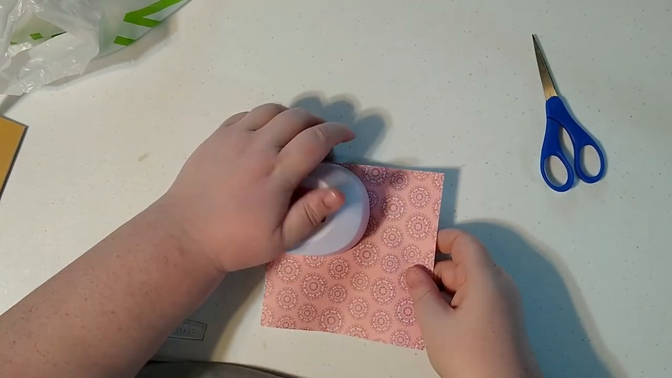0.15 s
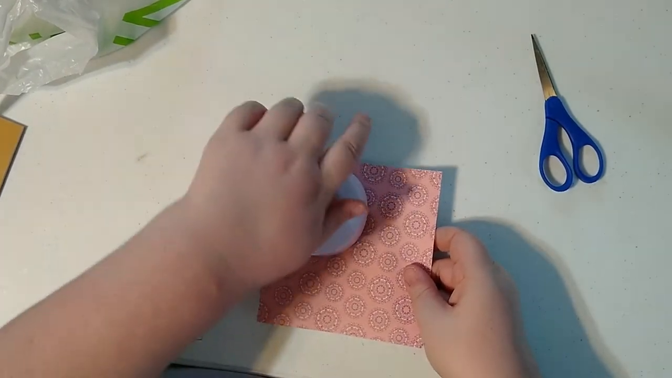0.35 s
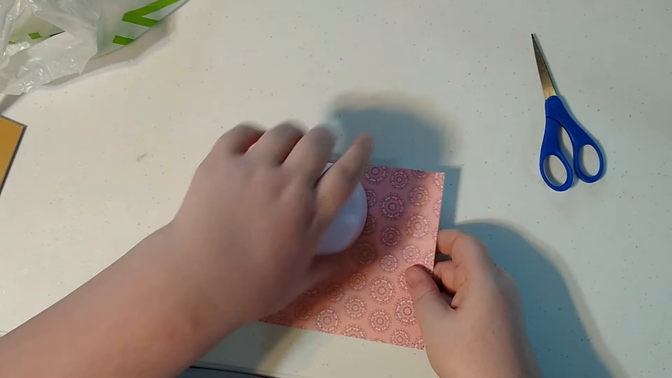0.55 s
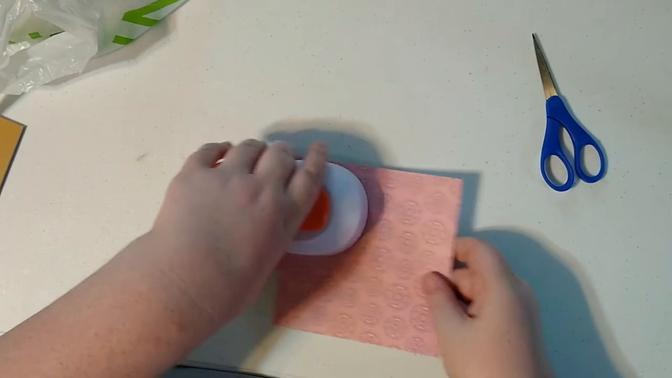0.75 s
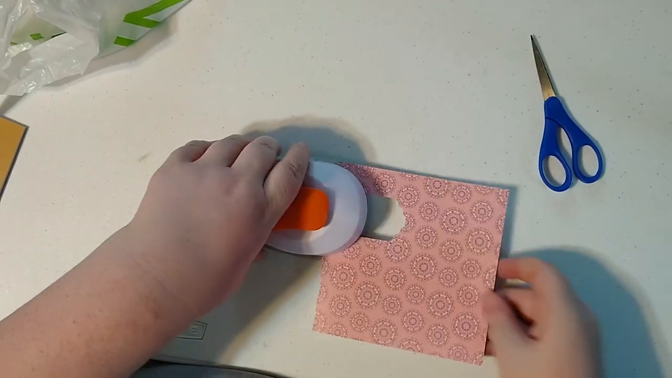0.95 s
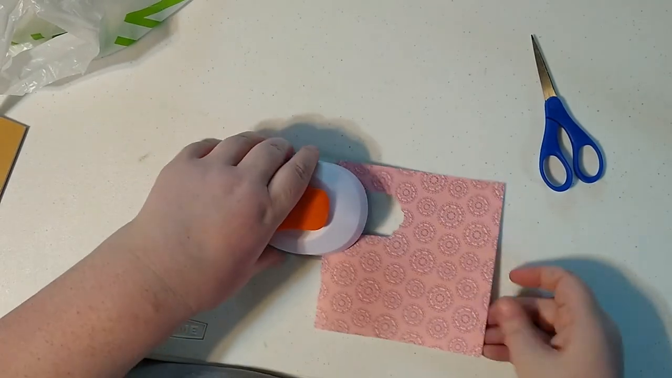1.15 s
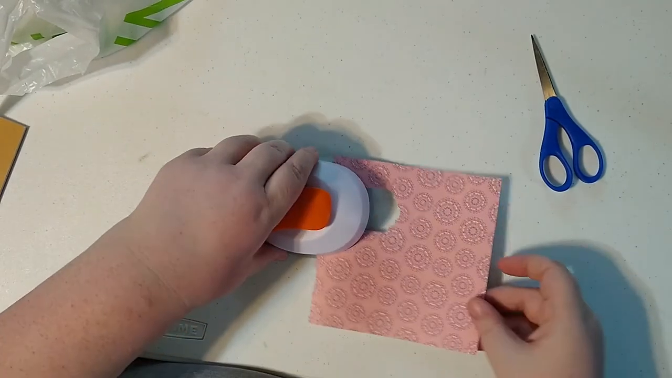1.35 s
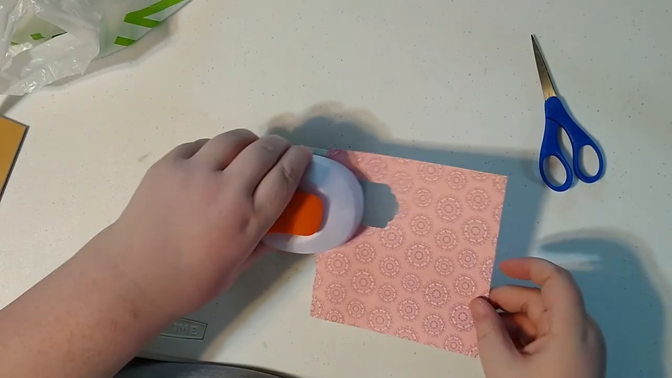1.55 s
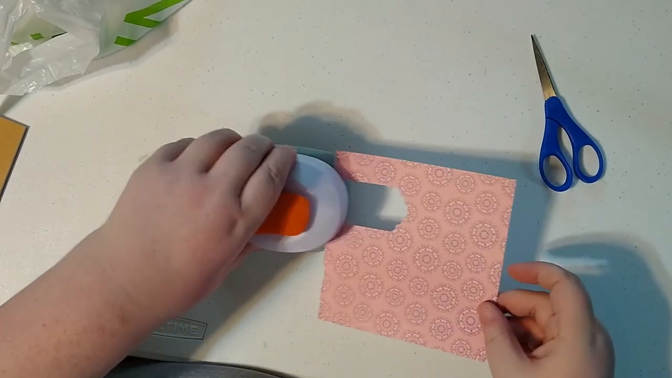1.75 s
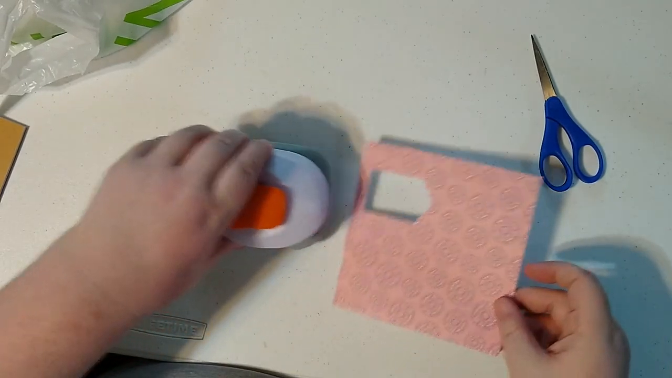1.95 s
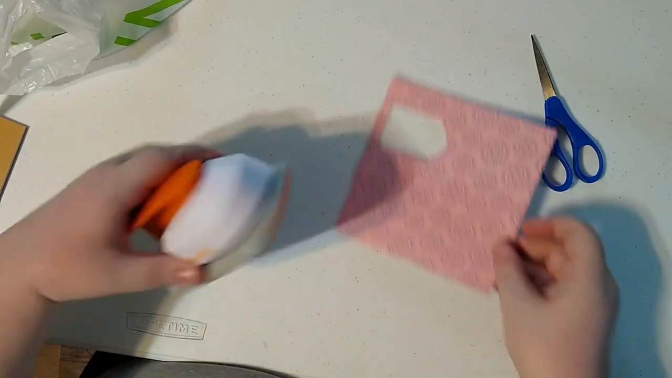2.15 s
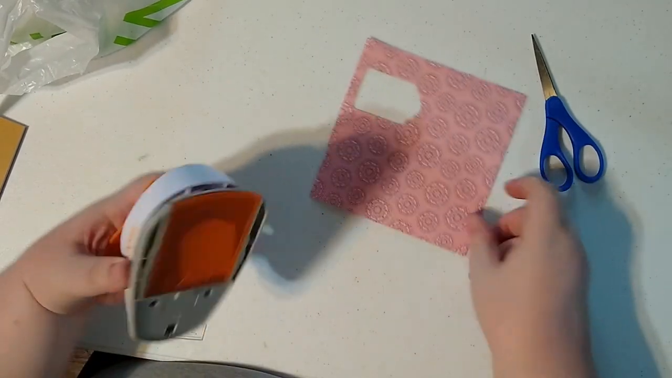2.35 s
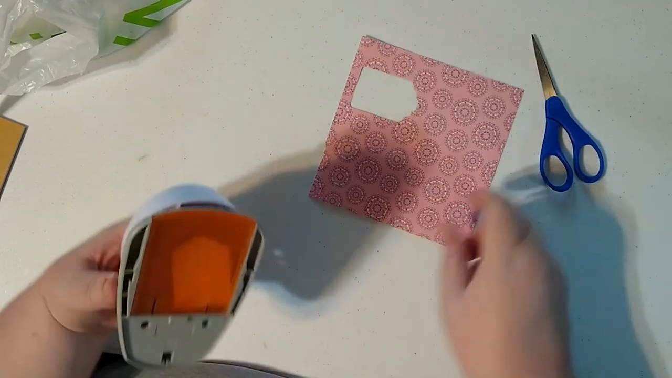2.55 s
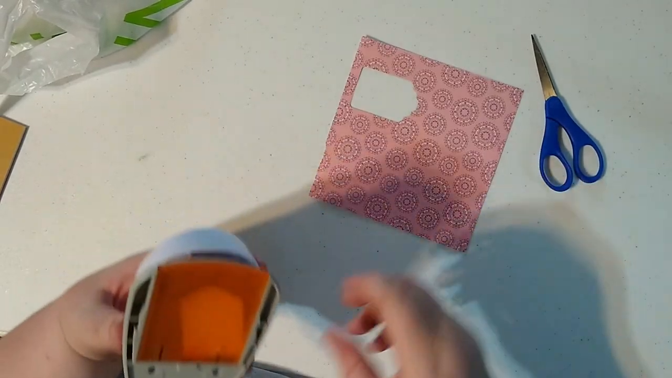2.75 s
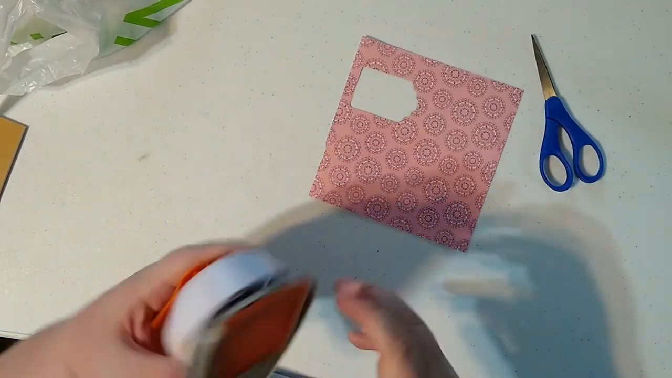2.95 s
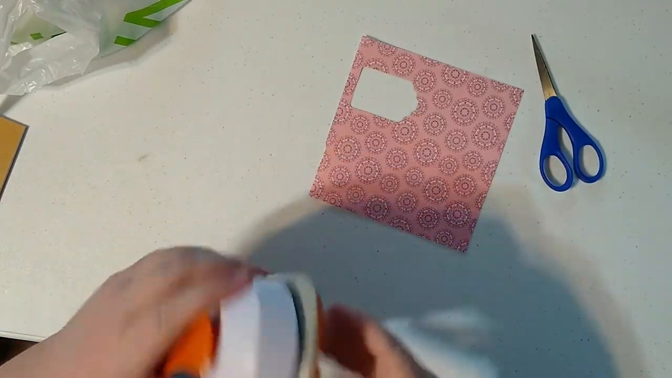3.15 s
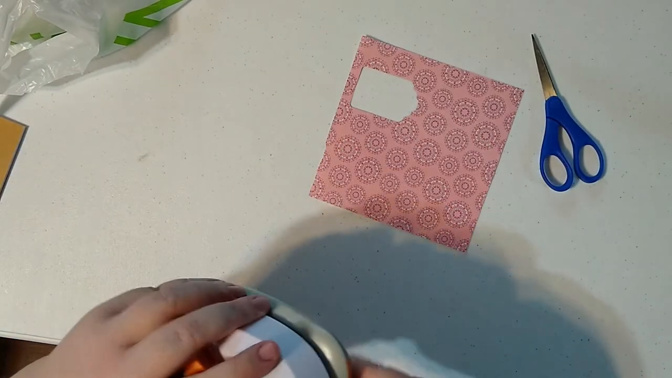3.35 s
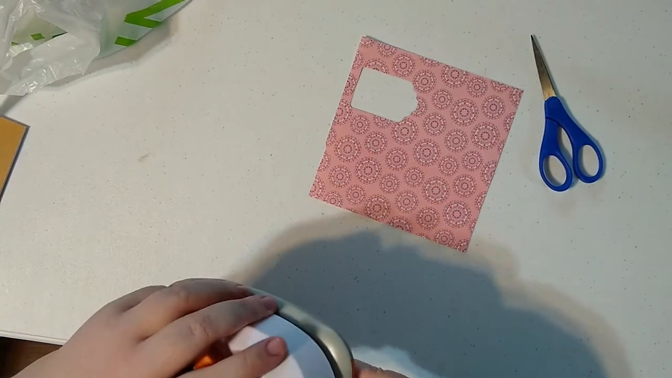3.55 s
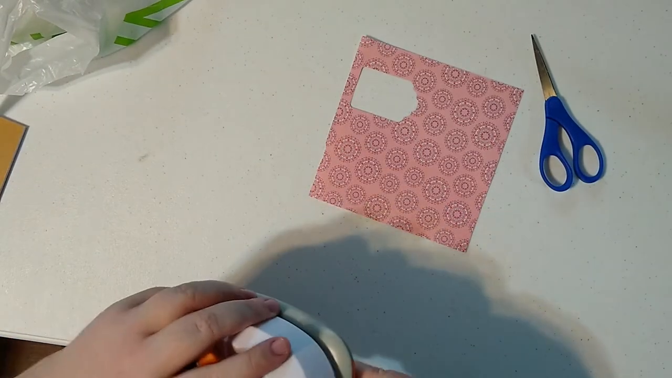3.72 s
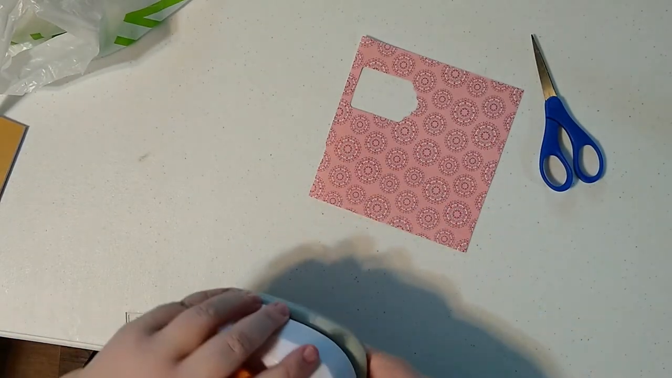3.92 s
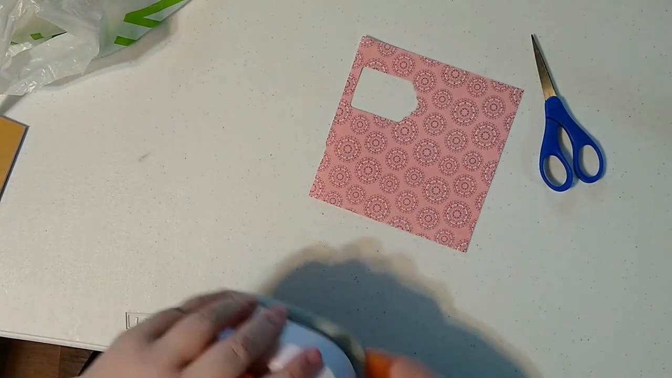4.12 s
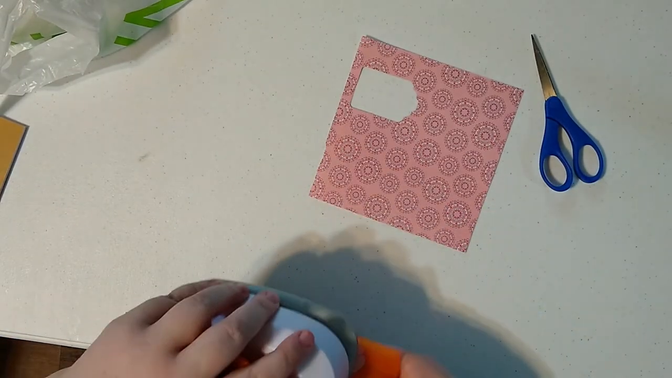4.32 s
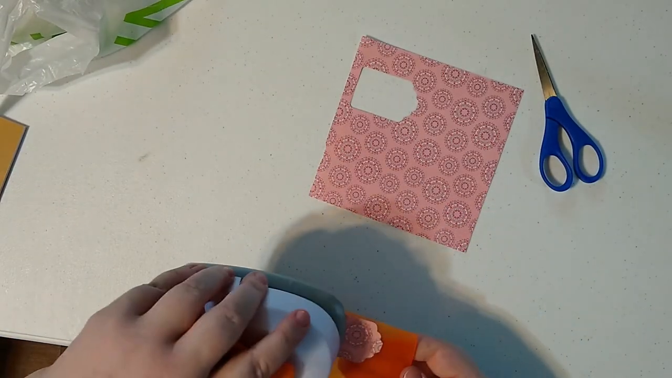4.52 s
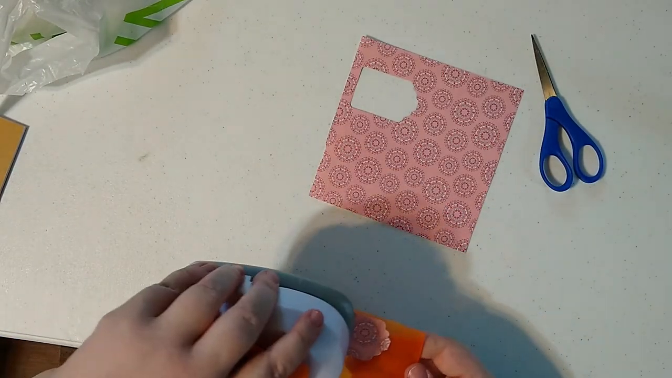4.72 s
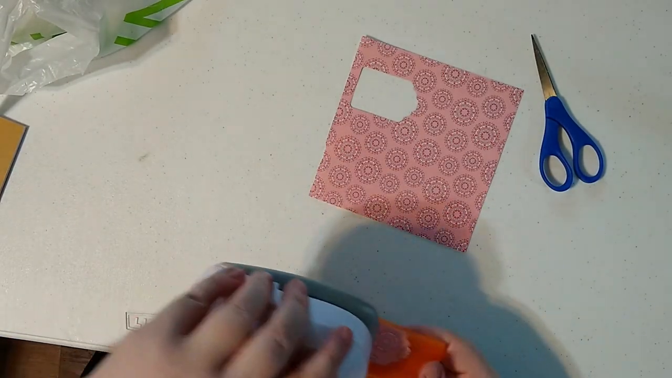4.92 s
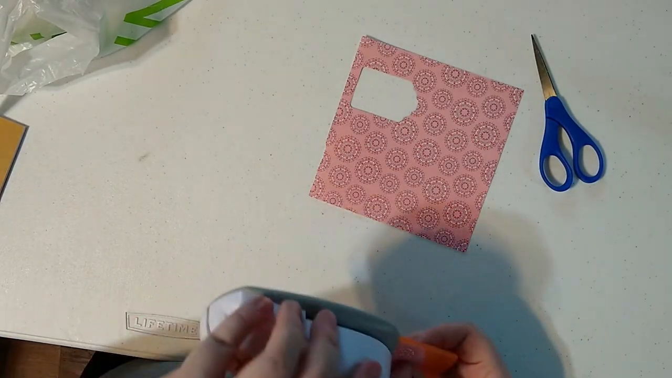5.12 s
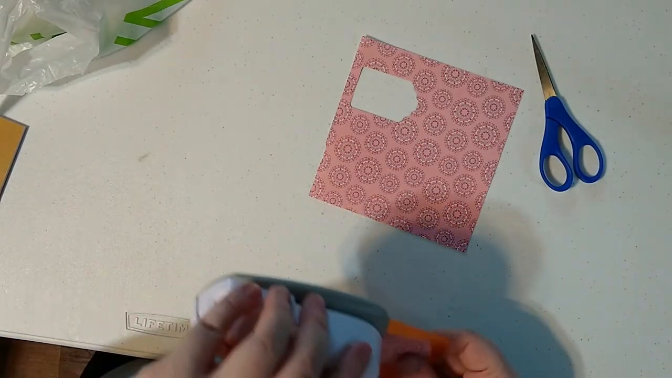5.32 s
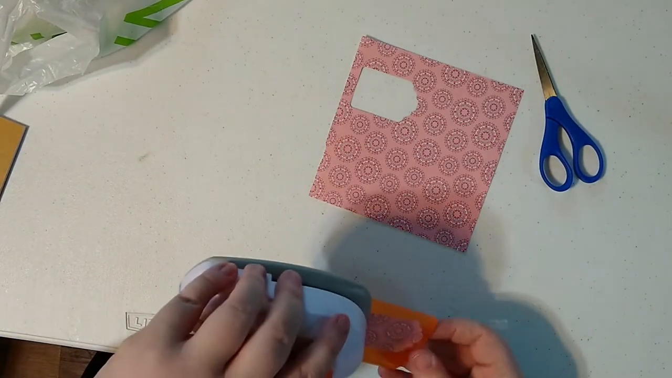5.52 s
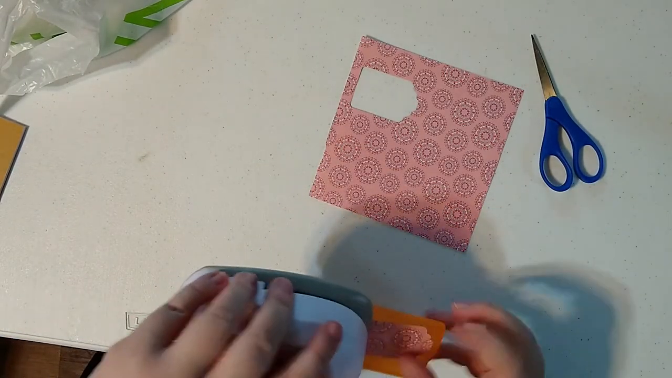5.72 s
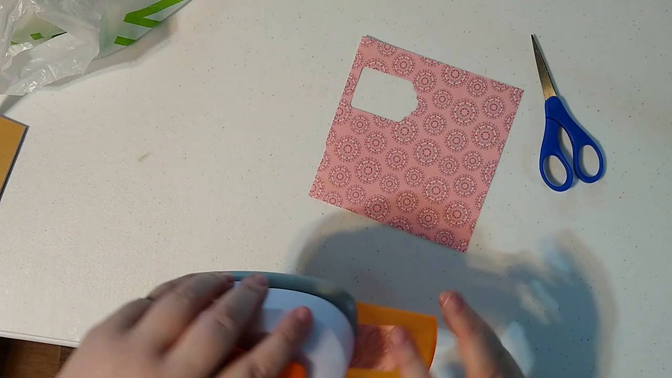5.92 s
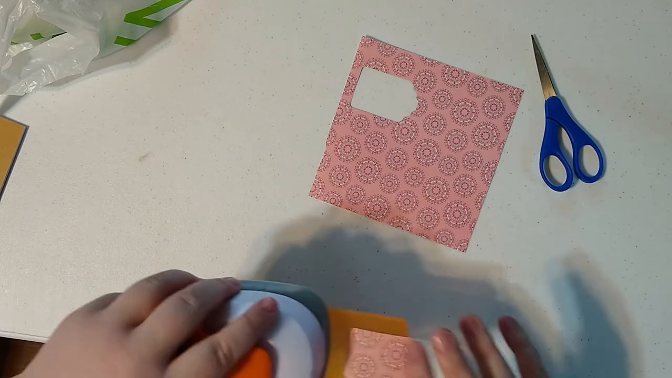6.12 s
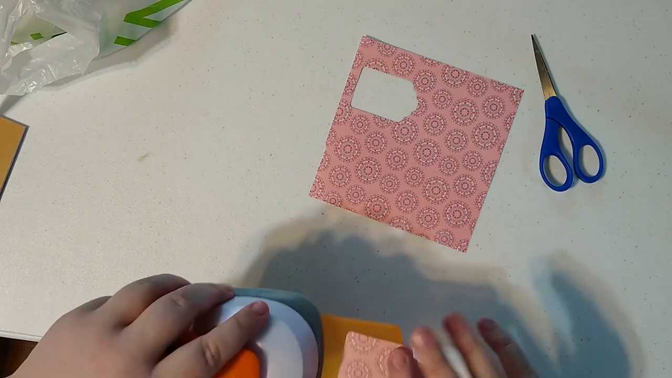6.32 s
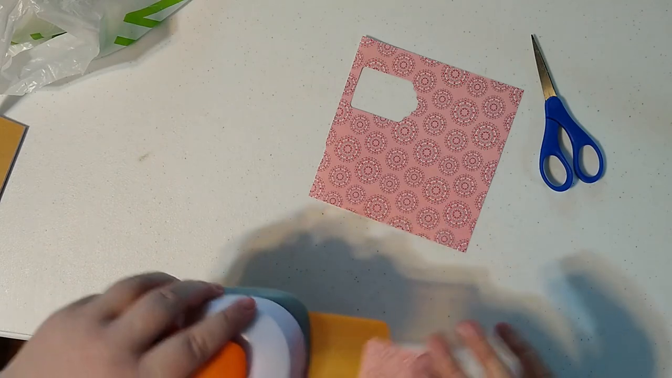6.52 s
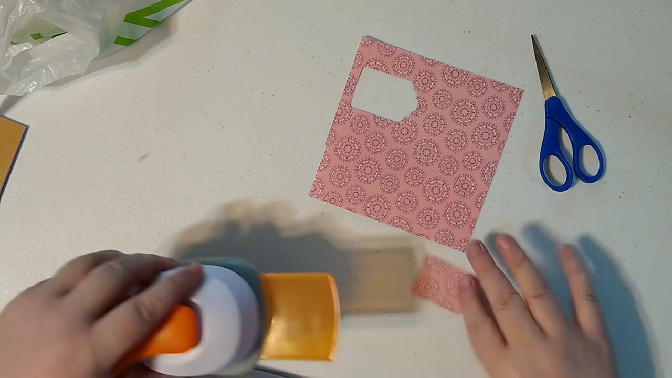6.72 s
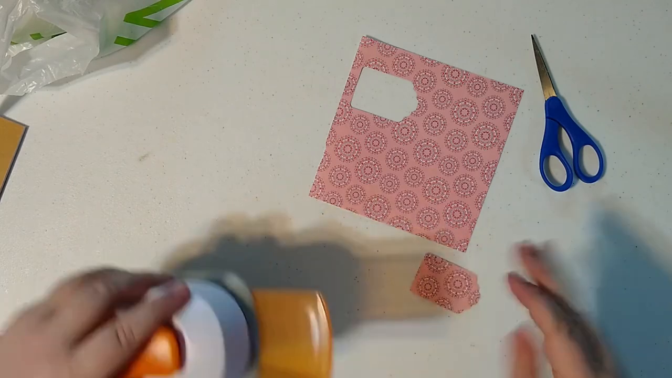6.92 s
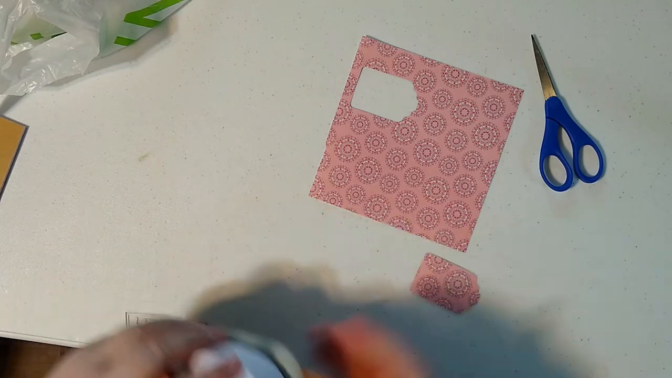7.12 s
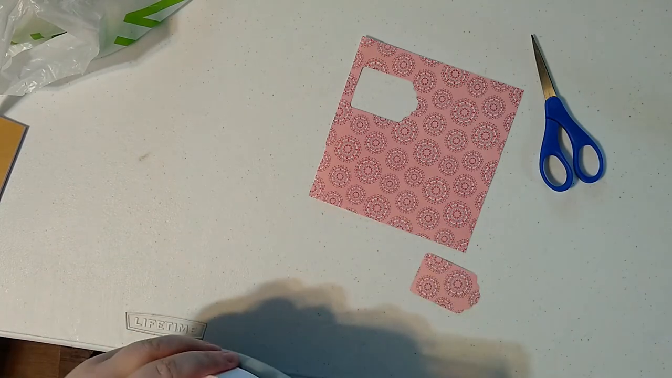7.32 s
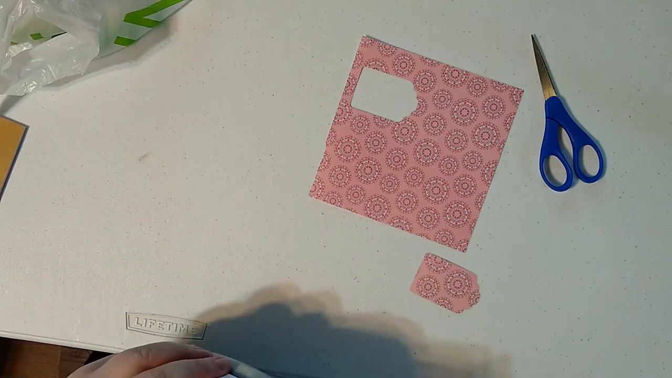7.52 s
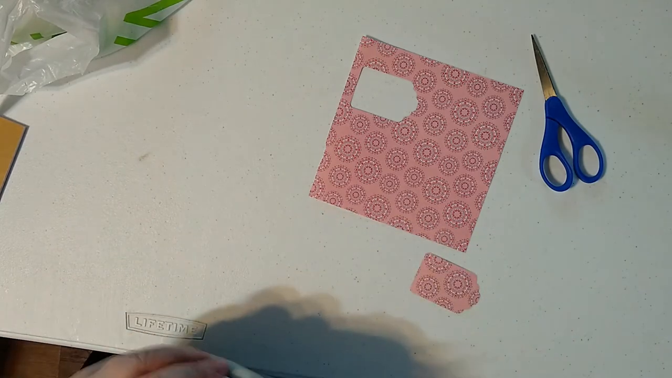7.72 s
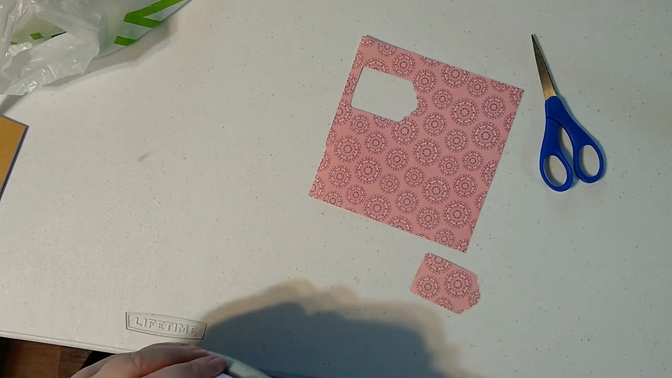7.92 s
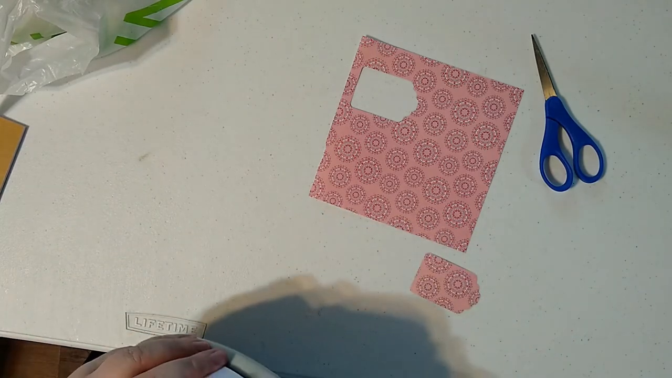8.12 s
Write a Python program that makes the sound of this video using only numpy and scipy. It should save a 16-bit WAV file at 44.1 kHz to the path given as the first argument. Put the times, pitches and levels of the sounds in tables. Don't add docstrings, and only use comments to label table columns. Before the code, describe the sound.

Quiet, small-room air with faint mains hum and light hiss, heard close in stereo. At 0.25 s a soft slack movement leads into a quick plastic creak with crackling paper fibres; around 0.39 s the sheet tears through with a sharp crunch, and at 0.44 s the punch slams home, by far the loudest sound, a hard thud with a bright crack and a table shudder dying within about 0.2 s. At 1.04 s the lever springs back in a light rattle. Thin paper rustles and faint knocks continue to 3.5 s as the punch is turned over. From 3.7 to 4.6 s the tray clicks, catches and scrapes outward. Very faint ticks and fine rubbing follow until 6.9 s, where there is a soft bump. From 7.3 s the tray knocks and scrapes inward, then snaps shut at 7.86-7.9 s in a loud, bright plastic clatter that quickly settles.

```python
import sys
import numpy as np
from scipy import signal
from scipy.fft import rfft, irfft, next_fast_len
from scipy.io import wavfile

SR = 44100
rng = np.random.default_rng(int(sys.argv[2]) if len(sys.argv) > 2 else 0)


def output_pcm(signal):
    pcm = np.clip(np.atleast_2d(signal).T, -1, 1) * 32767
    wavfile.write(sys.argv[1], SR, np.round(pcm).astype(np.int16))


def volts(x):
    e = np.asarray(x, float) / 20
    return 10 ** e


N = 359856

# pitch in Hz, width in Hz, level in dB.
TRAY_WALLS = [(2970, 920, 4.5), (3840, 650, -0.5), (5100, 2700, -10.5), (7800, 2200, -18.5)]


def slam():
    # start in seconds, peak in dB, pitch of the push in Hz.
    blow = (.4408, -0.65, 520)
    # pitch in Hz, level in dB, time to fade by 60 dB in seconds.
    table_notes = [(135.1, -7.5, 0.21), (187, -12, 0.2), (227.4, -3, 0.17), (272, -8, 0.25), (324, 2, 0.16),
                   (397.6, 2, 0.094), (455, -3, 0.13), (514, 1, 0.12), (537.4, -8, 0.17), (580, -4, 0.11),
                   (760.5, -6, .12), (820, -2.5, 0.11), (899, -10.5, 0.095), (990, -16.5, 0.14)]
    # pitch in Hz, level in dB per Hz.
    shudder_colour = [(24, -68), (50, -36), (90, -26), (134, -5), (230, -9.5), (298, -13.5), (333, -2.5),
                      (571, -18), (789, -19.5), (1680, -34.5), (2230, -45), (3220, -42), (7000, -59.5),
                      (9100, -93), (15400, -120)]
    start, db, push_hz = blow
    out, t = np.zeros((2, N)), np.arange(SR // 3) / SR
    lead_in = .002
    late = np.maximum(t - lead_in, 0)

    u = np.pi * push_hz * (t - lead_in)
    push = (1 - 2 * u ** 2 - 0.029 * u ** 3) * np.exp(-u ** 2)

    crack_modes = modes([(1550, 500, 3), (3200, 1400, 0), (5600, 2500, -12), (11000, 7000, -19)])
    crack = volts(-6.5 - 60 * late / 0.0049) * (late > 0) * rng.standard_normal(len(t))
    crack = filtered(crack, lambda f: crack_modes(f) * resonance(f, 2300, 6000))

    ring = np.zeros(len(t))
    for hz, note_db, t60 in table_notes:
        fade = volts(note_db - 60 * late / min(t60, .17))
        ring += fade * np.sin(2 * np.pi * hz * late + rng.uniform(0, 2 * np.pi))
    shudder = unit(filtered(rng.standard_normal((2, len(t))), lambda f: volts(along(shudder_colour, f))))
    shudder = shudder * volts(-60 * late / 0.18)
    rise = 1 - np.exp(-late / 0.0026)

    def land_twice(x):
        second = np.pad(x, ((0, 0), (round(.022 * SR), 0)))[:, :len(t)]
        return x + volts(-3) * second

    thump = push + crack + land_twice(volts(-15) * shudder * rise)
    add(out, volts(db) * room(thump, wet_db=-8.5, life=0.76), start - lead_in)
    add(out, volts(db - 12.5) * land_twice(peak_one(ring) * rise * [[1], [1]]), start - lead_in)
    return out


def press():
    # time in seconds, creak in dB.
    force = [
        (.3, -69.5),
        (.324, -49),
        (.342, -32),
        (.378, -34.5),
        (.388, -28),
        (.397, -19.5),
        (.41, -30.5),
        (.428, -38.5),
        (.439, -36),
    ]
    # pitch in Hz, level in dB per Hz.
    creak_colour = [(35, -48.5), (60, -22.5), (139, 4), (415, -2), (517, 3.5), (674, -3.5), (1300, -15.5),
                    (1570, -11.5), (2500, -31), (3250, -55.5), (5500, -120)]
    # pitch in Hz, level in dB per Hz.
    tear_colour = [(710, -45), (1200, -16), (1570, -8), (2100, -14.5), (3440, -16), (7970, -36),
                   (8880, -57), (9990, -32.5), (15700, -41)]
    # start in seconds, length in seconds, level in dB.
    slack_move = (.254, .068, -53.5)
    t = np.arange(N) / SR
    seconds, force_db = np.transpose(force)
    creak = volts(np.interp(t, seconds, force_db, -140, -140))
    tear = volts(-37.5) * (creak / volts(-28.5)) ** 1.05

    start, length, db = slack_move
    late = np.clip(t - start, 0, length)
    slack = volts(db - 127 * late)
    slack = slack * np.minimum(late / 0.002, 1) * (late < length)
    slack_colour = [(250, -19.5), (400, -3), (680, -1.5), (950, -13), (1500, -20.5), (2500, -71.5)]
    out = slack * grainy(slack_colour, rough_db=1.0, rate=130)
    out = out + creak * grainy(creak_colour, rough_db=-0.5, rate=120)
    return out + tear * grainy(tear_colour, rough_db=3.5, rate=420)


def die_breaks_through():
    # start in seconds, peak in dB, pitch in Hz, click of the walls in dB.
    jolts = [
        (0.382, -25.5, 1298, -14),
        (0.3928, -11, 1589, -16),
        (0.396, -17, 581, -17.5),
        (0.4, -19, 880, -14),
    ]
    return taps(jolts, own_db=2.5, wet_db=-8, life=0.99, edge_db=-30.5, t60=0.0071, thin_hz=420,
                attack=.0004, ring_db=-5, ring_cycles=22)


def fibres_crackle():
    # start in seconds, peak in dB, pitch in Hz, click of the walls in dB.
    snaps = [(.305, -62, 650, 0), (.309, -60, 630, -1), (.328, -38, 520, -14), (.3333, -42, 668, -3),
             (.3417, -36, 510, -4.5), (.352, -36, 600, -3), (.3602, -36, 641, -4.5), (.366, -37.5, 560, -6),
             (.377, -34.5, 1250, -4)]
    return taps(snaps, own_db=1.5, wet_db=-9.5, life=0.8, edge_db=-22, t60=.007, thin_hz=350, attack=.0004)


def lever_rebounds():
    # start in seconds, peak in dB, pitch in Hz, click of the walls in dB.
    rattles = [
        (1.0405, -55, 2580, 0),
        (1.0445, -27.5, 920, -3),
        (1.049, -27.5, 1220, -4.5),
        (1.054, -34.5, 1560, -18),
        (1.059, -36, 1360, -16),
        (1.066, -41.5, 920, -17),
    ]
    return taps(rattles, own_db=9.5, wet_db=-11, life=0.65, edge_db=-23.0, t60=0.012, thin_hz=650,
                attack=0.00084, ring_db=-3, ring_cycles=18)


def tray_snaps_shut():
    # start in seconds, peak in dB, pitch in Hz, click of the walls in dB.
    strikes = [(7.8562, -13.5, 1679, 4), (7.858, -11, 632, -3), (7.8645, -18, 649, -7.5),
               (7.872, -26.5, 1100, -6.5), (7.8818, -16, 1131, 0.5), (7.8845, -22, 1568, 5),
               (7.8885, -11, 1061, -11), (7.8898, -10, 1628, -11), (7.9, -25, 1780, -4.5),
               (7.906, -24.5, 771, -9.5), (7.913, -25.5, 1368, -9.5), (7.921, -30, 850, -6.5),
               (7.933, -31.5, 1094, -16), (7.943, -34, 1101, -12), (7.957, -37, 1150, -16)]
    return taps(strikes, own_db=5.5, wet_db=-6.0, life=0.7, edge_db=-14.0, t60=0.0082, thin_hz=436,
                attack=0.0005, ring_db=-8.5, ring_cycles=21, walls=TRAY_WALLS, top_hz=9500)


def tray_catches():
    # start in seconds, peak in dB, pitch in Hz, click of the walls in dB.
    catches = [(3.712, -54, 990, -11), (3.771, -63, 1500, 2), (3.7745, -33.5, 940, 2.5),
               (3.7785, -34, 975, -20), (3.855, -53, 1015, 2), (3.875, -54, 1070, -8),
               (3.943, -45, 1050, -2), (4.032, -45.5, 1016, -13), (4.212, -33.5, 1000, -10),
               (4.228, -56, 990, -14), (4.239, -47, 970, 1), ]
    return taps(catches, own_db=12, wet_db=-14, life=0.8, edge_db=-28.5, t60=0.0142, thin_hz=520,
                attack=0.00084, ring_db=-7, ring_cycles=30)


def tray_runs_over_stops():
    # start in seconds, peak in dB, pitch in Hz, click of the walls in dB.
    knocks = [(4.484, -57, 1430, -4), (4.524, -54, 1770, -6), (4.5366, -48.5, 1400, 5),
              (4.555, -55, 1500, 1), (4.5894, -41, 1420, -5), (4.5979, -39, 1690, -11),
              (4.601, -38, 700, -17)]
    return taps(knocks, own_db=-2, wet_db=-7.5, life=0.86, edge_db=-20.5, t60=0.0081, thin_hz=614,
                attack=0.0006)


def tray_pushed_in():
    # start in seconds, peak in dB, pitch in Hz, click of the walls in dB.
    knocks = [(7.3115, -42, 1769, 1), (7.3135, -43.5, 716, 1), (7.4345, -48.5, 947, -7.5),
              (7.5695, -46.5, 1790, -4.5), (7.633, -50.5, 820, -6), (7.665, -48.5, 1055, -20),
              (7.75, -58.5, 924, -10)]
    return taps(knocks, own_db=6, wet_db=-8.5, life=0.8, edge_db=-18, t60=0.011, thin_hz=450,
                attack=0.00064, walls=TRAY_WALLS, top_hz=9100)


def punch_turned_over():
    # start in seconds, peak in dB, pitch in Hz, click of the walls in dB.
    knocks = [(1.672, -56, 1105, -9), (1.742, -53, 1298, -16.5), (1.889, -50.5, 1350, -25.5),
              (2.005, -56, 1490, -12), (2.227, -47.5, 1357, -22), (2.437, -51, 1030, -10),
              (3.081, -49, 920, -15), (3.124, -49.5, 899, -9), (3.194, -56, 1650, -14),
              (3.203, -44.5, 990, -16), (3.216, -53.5, 800, -24), (3.52, -47.5, 884, -7)]
    return taps(knocks, own_db=7.5, wet_db=-4.5, life=.75, edge_db=-34.0, t60=0.019, thin_hz=715,
                attack=0.00072)


def edges_tick():
    # start in seconds, peak in dB, pitch in Hz, click of the walls in dB.
    ticks = [(0.678, -56, 1181, -10), (0.911, -65, 899, 9.5), (1.352, -68.5, 936, 11),
             (2.175, -68, 1500, -1.5), (2.46, -54.5, 963, -3), (4.196, -57, 1080, -6),
             (4.888, -61, 1056, 1), (5.3, -62.5, 1200, -7), (5.423, -49.5, 1170, -10),
             (5.77, -56.5, 1420, -4.5), (5.948, -60, 942, 2), (6.706, -57.5, 1410, 2.5),
             (6.855, -60, 1130, 1), (6.877, -60.5, 773, 5.5)]
    return taps(ticks, own_db=2, wet_db=-7, life=.75, edge_db=-12.5, t60=0.016, thin_hz=868, attack=0.00065)


def bump():
    # start in seconds, peak in dB.
    jolts = [
        (1.058, -58.5),
        (3.79, -60),
        (6.871, -52),
        (7.875, -46),
        (7.901, -55),
    ]
    out, t = np.zeros((2, N)), np.arange(SR // 8) / SR
    for start, db in jolts:
        burst = rng.standard_normal((2, len(t))) * volts(-60 * t / 0.15)
        thud = filtered(burst, lambda f: resonance(f, 197.4, 250.8) ** 2)
        add(out, volts(db) * room(peak_one(thud), wet_db=5.5), start - .015)
    return out


def slide():
    # start in seconds, length in seconds, scrape in dB, fine hiss over it in dB.
    sheet = [(0.041, 0.043, -72.5, -23.5), (0.678, 0.27, -69, -20), (0.853, 0.24, -63, -15),
             (1.05, .15, -71, -8), (1.17, 0.072, -72, -16), (1.28, .17, -68.5, -15.5),
             (1.417, 0.132, -66, -28), (1.628, 0.14, -66, -18), (1.739, 0.1933, -73, -24),
             (2.21, 0.18, -77, -7), (2.36, 0.15, -70, -20.5)]
    # start in seconds, length in seconds, scrape in dB, fine hiss over it in dB.
    fingers = [(1.5, 0.405, -68.5, -25), (3.09, 0.11, -81, -25), (3.96, 0.16, -72.5, -23.5),
               (4.45, 0.14, -61.5, -23), (4.55, 0.085, -65, -8.5), (5.38, 0.13, -72.5, -5.5),
               (5.74, 0.094, -78, -16), (5.9, 0.092, -75, -21), (6.15, 0.045, -74.5, -12),
               (6.21, 0.13, -72.5, -3), (6.52, 0.15, -76.5, -4.5), (6.62, 0.088, -73, -18),
               (6.69, .04, -69, -2), (7.32, 0.213, -69.5, -21), (7.61, 0.099, -62, -24)]
    # start in seconds, time to fade by 60 dB in seconds, scrape in dB, fine hiss over it in dB.
    slips = [(3.2, 0.049, -67, -30), (3.85, 0.268, -58.5, -25), (3.941, 0.096, -50.5, -20),
             (4.221, 0.35, -50, -23), (6.871, .2, -61, -7), (7.569, 0.18, -61, -28),
             (7.661, 0.13, -55.5, -28.5), (7.738, 0.252, -59.5, -23.5)]
    # pitch in Hz, level in dB per Hz.
    rustle_colour = [(300, -33), (700, -9), (1400, -9), (2400, -10.5), (3400, -9.5), (5500, -21),
                     (7500, -33.5), (12000, -71)]
    # pitch in Hz, level in dB per Hz.
    scrape_colour = [(240, -39), (400, -6.5), (691, -12), (757, -2), (1360, -2), (2260, -3.5), (3340, -8.5),
                     (4230, -8), (9000, -35.5), (11700, -64), (19800, -120)]
    # pitch in Hz, level in dB per Hz.
    fine_colour = [(2940, -38), (5000, -4), (5800, 4), (8840, -3), (12800, 3), (15700, -1.5)]
    rustle, sheet_hiss = strokes(sheet, [])
    scrape, finger_hiss = strokes(fingers, slips)
    rub = rustle * grainy(rustle_colour, rough_db=2.5, rate=210)
    rub = rub + scrape * grainy(scrape_colour, rough_db=2.5, rate=620)
    return rub + volts(2.5) * (sheet_hiss + finger_hiss) * grainy(fine_colour, rough_db=5.0, rate=930)


def air():
    # pitch in Hz, level in dB per Hz.
    air_colour = [(15, -53), (25, -26), (64, -13), (95, -7.5), (124, 5), (265, -1), (311, -2.5),
                  (383, -2.5), (471, -2.5), (553, -8.5), (936, -11.5), (1590, -16.5), (2190, -26.5),
                  (3160, -25.5), (4450, -36), (6000, -36.5), (7800, -60.5), (13200, -120)]
    # pitch in Hz, level in dB.
    hum_lines = [(120, -79.5), (312, -79.5)]
    t = np.arange(N) / SR
    hum = sum(volts(db + 7.5) * np.sin(2 * np.pi * hz * t) for hz, db in hum_lines)
    return volts(-65) * grainy(air_colour, rough_db=-0.5, rate=9.8) + hum


def taps(events, own_db, wet_db, life, edge_db, t60, thin_hz, attack, ring_db=-12, ring_cycles=25,
         walls=None, top_hz=6400):
    # pitch in Hz, width in Hz, level in dB.
    shell = [(560, 51, -1), (990, 920, -7.5), (1909, 210, -10.5)]
    # pitch in Hz, width in Hz, level in dB.
    ribs = [(2750, 1800, 0), (3922, 900, 3), (5940, 2000, -7.5)]
    wall_modes = modes(ribs if walls is None else walls)
    out, t = np.zeros((2, N)), np.arange(SR // 16) / SR
    rise = 1 - np.exp(-t / attack)

    def thin(f):
        return (1j * f / (1j * f + thin_hz)) ** 4 + volts(-24)

    for start, db, hz, click_db in events:
        burst = rng.standard_normal((4, len(t))) * volts(-60 * t / t60) * rise
        body_modes = modes(shell + [(hz, .2 * hz, own_db)])
        body = filtered(burst[0], lambda f: thin(f) * body_modes(f) / (1 + (f / 2600) ** 4))
        ring = np.sin(2 * np.pi * hz * t) * volts(ring_db - 60 * t * hz / ring_cycles) * rise
        click = filtered(burst[1], lambda f: wall_modes(f) * resonance(f, 1900, 3300) / (1 + (f / top_hz) ** 8))
        edge = filtered(burst[2:], lambda f: resonance(f, 12000, 13000) ** 2)
        tap = peak_one(body) + ring + volts(click_db + 2.5) * peak_one(click) + volts(edge_db) * peak_one(edge)
        add(out, volts(db - 1.0) * room(tap, wet_db, life), start - .0008)
    return out


def strokes(drags, slips):
    gains, t = np.zeros((2, N)), np.arange(SR // 2) / SR

    def drag(length):
        return abs(np.sin(np.pi * np.clip(t / length, 0, 1) ** 1.9)) ** 0.74

    def slip(t60):
        return volts(-60 * t / t60) * (1 - np.exp(-t / 0.0027))

    for shape, rows in ((drag, drags), (slip, slips)):
        for start, length, db, hiss_db in rows:
            add(gains, volts([[db], [db + hiss_db]]) * shape(length), start)
    return gains


def grainy(spectrum, rough_db, rate):
    knots = np.clip(rng.standard_normal(int(N * rate / SR) + 2), -2, 2)
    bursts = volts(rough_db * np.interp(np.arange(N) * rate / SR, np.arange(len(knots)), knots))
    return unit(filtered(bursts * rng.standard_normal((2, N)), lambda hz: volts(along(spectrum, hz))))


def room(x, wet_db, life=0.64):
    # pitch in Hz, time to fade by 60 dB in seconds.
    fade_times = [(100, 0.25), (300, 0.22), (1000, .18), (4000, 0.19), (12000, 0.22)]
    length = SR // 4
    hz, t, z = signal.stft(rng.standard_normal((2, length)), SR, nperseg=256)
    fade = volts(-60 * t / life / along(fade_times, hz)[:, None])
    far_end = volts(-24 - 60 * t / 0.4)
    tail = signal.istft(z * (fade + far_end), SR, nperseg=256)[1][:, :length]
    tail = np.pad(tail / np.linalg.norm(tail[0]), ((0, 0), (200, 0)))
    out = volts(wet_db) * signal.fftconvolve(x * [[1], [1]], tail, axes=1)
    out[:, :x.shape[-1]] += x
    return out


def ports(paths, alike, spread, apart_hz, leak=0.0067):
    # pitch in Hz, lead in radians.
    right_lead = [(60, 1.8), (200, 1.5), (600, 1), (1100, 0.075), (1600, .3)]
    port_hz = 2200
    m = next_fast_len(N + 4096)
    hz, both = np.fft.rfftfreq(m, 1 / SR), rfft(paths, m)
    turn = 2 * np.pi * np.maximum(hz / port_hz - .5, 0)
    lead = (turn - 0.67 * np.sin(turn) + spread * along(right_lead, hz) * (hz < port_hz / 2)) / 2
    share = np.clip(alike, 0, 1)
    mid = both[0] * np.cos(lead)
    side = (share * both[0] + np.sqrt(1 - share ** 2) * both[1]) * 1j * np.sin(lead)
    apart = leak / (1 + (1500 / (hz + 1)) ** 4) + (1 - leak) / (1 + (apart_hz / (hz + 1)) ** 6)
    apart = np.clip(apart, 0, 1)
    matrixed = np.array([mid - side, mid + side]) * np.sqrt(1 - apart)
    return irfft(matrixed + both * 1j * np.sqrt(apart), m)[:, :N]


def resonance(f, hz, width):
    return 1j * f * width / (hz * hz - f * f + 1j * f * width)


def modes(table):
    return lambda f: sum((-1) ** k * volts(db) * resonance(f, hz, w) for k, (hz, w, db) in enumerate(table))


def filtered(x, response):
    m = next_fast_len(x.shape[-1] + 4096)
    return irfft(rfft(x, m) * response(np.fft.rfftfreq(m, 1 / SR)), m)[..., :x.shape[-1]]


def along(points, hz):
    f, v = np.transpose(points)
    return np.interp(np.log(hz + 1), np.log(f + 1), v)


def unit(x):
    return x / np.sqrt(np.mean(x ** 2) + 1e-20)


def peak_one(x):
    return x / abs(x).max()


def add(out, x, start):
    part = out[:, round(start * SR):][:, :x.shape[1]]
    part += x[:, :part.shape[1]]


def scene():
    punch = slam() + press() + die_breaks_through() + fibres_crackle() + lever_rebounds()
    punch = punch + punch_turned_over() + edges_tick() + bump()
    tray = tray_snaps_shut() + tray_catches() + tray_runs_over_stops() + tray_pushed_in()
    near = ports(punch, alike=.45, spread=0.44, apart_hz=9510, leak=.025)
    near = near + ports(tray, alike=.45, spread=0.5, apart_hz=10500, leak=0.011)
    far = ports(slide(), alike=0.51, spread=0.23, apart_hz=9020)
    far = far + ports(air(), alike=0.72, spread=0.9, apart_hz=9000)
    return near + far * volts([[.6], [-.6]])


def band_limit(x):
    return signal.sosfilt(signal.butter(12, 16460, fs=SR, output="sos"), x)


def record(dry):
    # pitch in Hz, level in dB per Hz.
    hiss_colour = [(600, -16), (2000, 4), (7000, -7), (15000, -6.5), (16000, -2)]
    noise = rng.standard_normal((2, N))
    hiss = volts(-79) * unit(filtered(noise, lambda hz: volts(along(hiss_colour, hz))))
    hiss = ports(hiss, alike=.3, spread=.6, apart_hz=11400) + volts(-2.0) * hiss[::-1, ::-1]
    hiss = hiss * volts([[.8], [-.8]])
    mix = filtered(dry + hiss, lambda hz: (hz < 15750) * (1j * hz / (1j * hz + 45)) ** 2)
    return band_limit(mix)


dry = scene()
out = record(dry)
output_pcm(out)
```